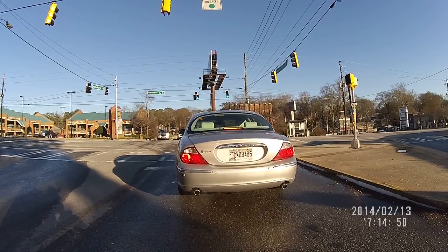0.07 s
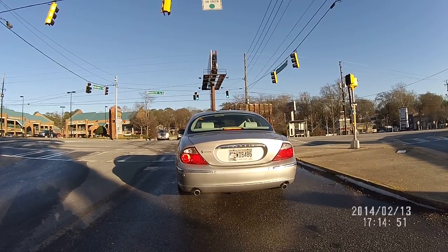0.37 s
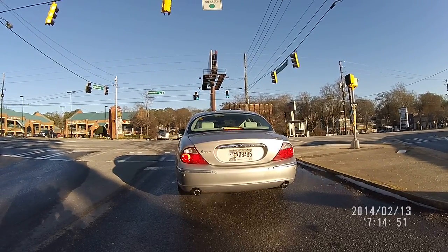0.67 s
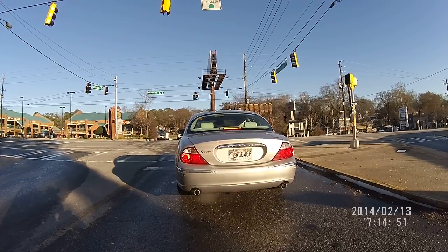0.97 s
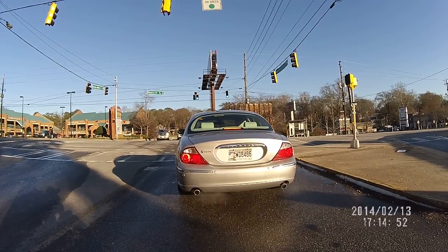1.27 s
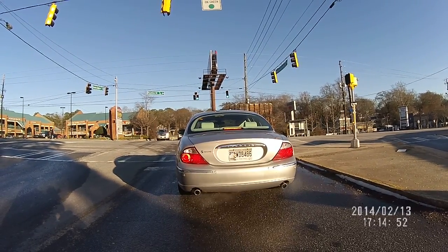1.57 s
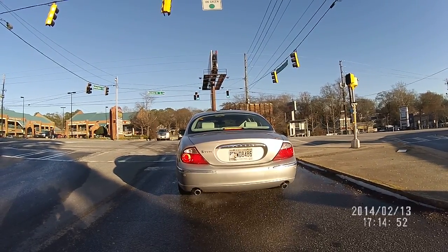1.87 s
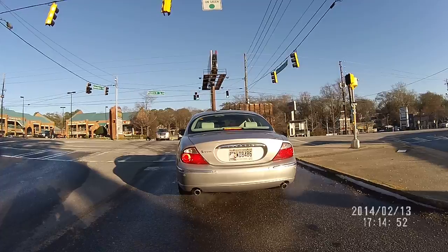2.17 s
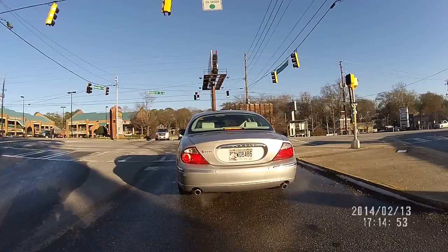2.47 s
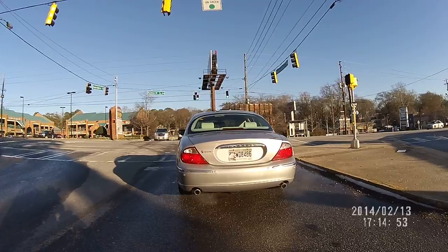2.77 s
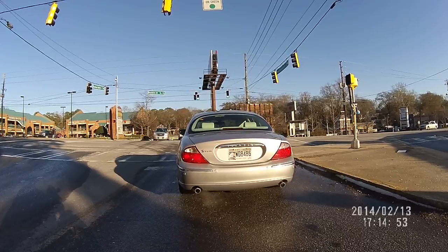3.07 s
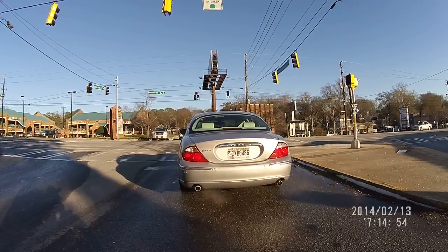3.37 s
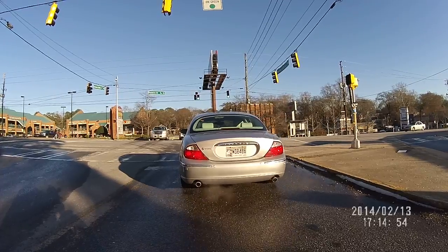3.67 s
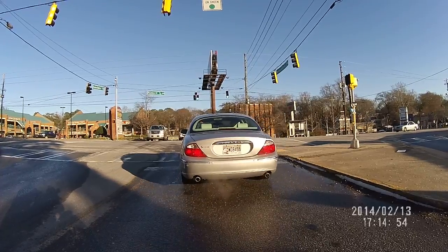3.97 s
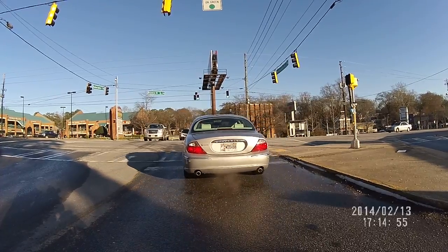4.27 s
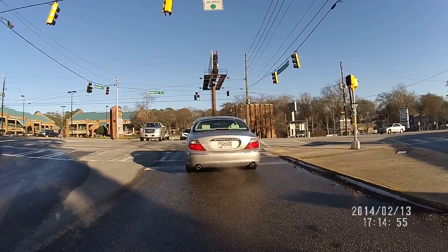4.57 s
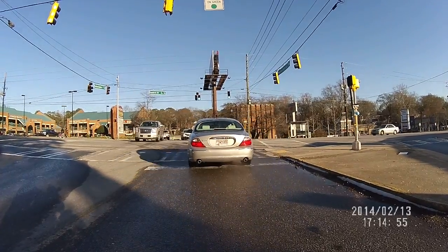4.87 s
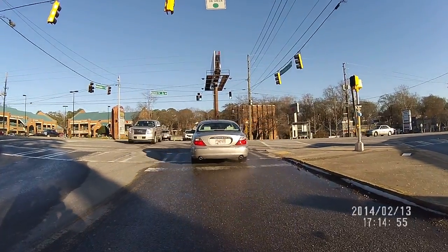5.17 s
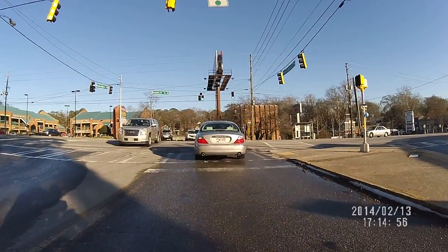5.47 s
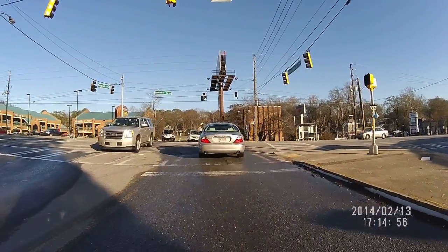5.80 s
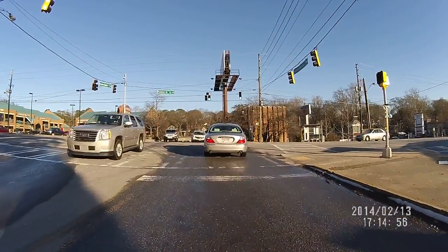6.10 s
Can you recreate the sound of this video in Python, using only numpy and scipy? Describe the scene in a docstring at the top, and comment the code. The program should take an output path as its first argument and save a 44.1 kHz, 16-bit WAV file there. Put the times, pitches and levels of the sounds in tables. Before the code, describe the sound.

A V-twin motorcycle idles at a road junction, heard from a microphone on the bike. Its exhaust thumps over a metallic valve clatter, small hisses and a low rumble. After about a second the idle turns uneven and limping. A sharp click and a dull clunk mark the gear going in. Then the throttle opens and the engine climbs in pitch and loudness, with a harsh rasp and a rising whine.

```python
"""A V-twin motorcycle idles at a traffic light, heard from a microphone on the bike.
Each firing thumps through the pipe and hisses; the valve gear clatters in the ringing engine cases.
After a second the idle starts to limp: the rear cylinder all but misses every third cycle.
Near 3.5 s come a sharp click and a clunk as the bike goes into gear.
From 4.4 s the throttle opens and it pulls away, with rasping valves and a rising whine."""
import sys
import numpy as np
from scipy import signal
from scipy.fft import rfft, irfft, next_fast_len
from scipy.io import wavfile
from scipy.ndimage import uniform_filter1d

SR = 44100
rng = np.random.default_rng(int(sys.argv[2]) if len(sys.argv) > 2 else 0)


def pcm_store(signal):
    """Save signal as 16-bit PCM."""
    levels = np.round(np.clip(np.atleast_2d(signal), -1, 1) * 32767)
    wavfile.write(sys.argv[1], SR, levels.astype(np.int16).T)


N = 270774
TIME = np.arange(N) / SR

# Levels in the tables are relative. A "fade" is the time a ring takes to drop by 60 dB.
# engine speed; each cylinder fires once a cycle: t/s, cycles a second
ENGINE_SPEED = [(0.0, 7.135), (0.916, 7.363), (1.11, 7.021), (1.795, 7.564), (2.017, 7.354), (3.145, 7.471),
                (4.449, 7.305), (4.818, 11.718), (4.963, 13.8), (5.135, 15.4), (5.26, 16.35), (5.44, 17.5),
                (5.8, 17.55), (5.95, 17.3), (6.14, 16.9)]
# load, or how hard the engine works: t/s, load (0-1)
ENGINE_LOAD = [(4.42, 0.07), (4.7, 0.2), (4.85, 0.43), (5.05, 0.54), (5.3, 0.75), (5.48, 0.85),
               (6.14, 0.77)]
# firing strength: load (0-1), front level/dB, rear level/dB
FIRING_LEVELS = [(0, -2, 5), (.13, 1, 1), (.45, 2.2, 0.9), (.68, -1, 0.67)]
# the limp (hard, weak, missed); the crank lags after the miss: rear level/dB, lag/s
LIMP_PATTERN = [(1.3, .0066), (-8.5, 0.0024), (-18.5, 0.000049)]
# ringing notes of the pipe and airbox: f/Hz, fade/s, strength at idle, strength under load
PIPE_NOTES = [(95, 0.078, -0.17, 0.35), (122.9, 0.14, 0.27, -0.081), (163, 0.21, -0.045, -0.0037),
              (207.3, 0.33, 0.11, 0.051), (227.4, 0.12, 0.077, 0.14), (271.2, 0.12, 0.033, -0.22),
              (309.4, 0.12, -0.092, 0.015), (364, 0.23, 0.031, -0.082), (438.6, 0.25, -0.0083, 0.041),
              (568, 0.11, -0.02, -0.029), (590, 0.071, .003, 0.06), (656, 0.054, -0.016, -0.0026)]
# ringing notes of the engine cases: f/Hz, width/Hz, level/dB
CASE_NOTES = [(429, 19, -10), (470, 46, -4), (607, 31.5, 3.5), (660.7, 51.5, 3), (718, 61, 1),
              (806, 43.5, 0), (1055, 170, -5.5), (1200, 103, -5.5), (1540, 83, -5.5), (1790, 87, -4),
              (1892, 57, -3), (2070, 174, -6.5), (2319, 56, -8), (2396, 57, -4), (2627, 20, -10.5),
              (2752, 64, -16.5)]
# broad tone of rattling metal: f/Hz, level/dB
METAL_TONE = [(100, -56), (220, 10), (330, 5.5), (600, -4), (950, -13.5), (1350, -12), (2500, -12.5),
              (3200, -19), (4200, -25), (5200, -20.5), (6200, -30), (7200, -37), (10000, -45), (14000, -60)]
# clatter around one cycle, easing on compression: share of a cycle, level/dB
CLATTER_CYCLE = [(0, 1), (.2, 1.5), (.42, 1), (.57, -1), (.72, 2.54), (.84, 0), (.93, 1.5)]
# tone that load adds to the clatter: f/Hz, level/dB
STRAIN_TONE = [(200, 2), (300, 2.5), (410, 1.5), (480, -3), (580, -2), (760, -5), (1000, -1), (1500, 1),
               (2000, 0), (2550, 4.5), (3200, 2.5), (5000, 4), (9000, 1)]
# tone of rushing gas: f/Hz, level/dB
GAS_TONE = [(300, 4.5), (700, 19.5), (1500, 7.5), (2500, 8), (3500, -2), (4300, -7.5), (5200, -1),
            (6800, -14), (8200, -13), (10000, -28.5), (15000, -35)]
# ringing notes of the rocker cover above the valves: f/Hz, level/dB, fade/s
ROCKER_NOTES = [(1540, -13, .05), (1875, -15, .03), (2380, -5, .025), (2480, -1, 0.026)]
# cam knocks: share of a cycle after the front firing, level/dB
CAM_HITS = [(.135, 1), (.705, -3), (.895, -3.5)]
# ringing notes of the cam cover: f/Hz, level/dB, fade/s
CAM_COVER_NOTES = [(573, -8, 0.051), (659, 0.5, .055), (719, -2.5, 0.041), (830, -7.5, .05)]
# tone of the rumbling frame: f/Hz, level/dB
FRAME_TONE = [(20, -46), (40, -22), (60, 2.5), (110, -0.5), (150, -5), (210, -3), (330, -17), (500, -38),
              (1500, -60)]
# loose parts knocking at idle: t/s, level/dB, f/Hz
LOOSE_HITS = [(0.411, -42, 1046), (0.7894, -43, 1100), (0.8901, -41, 1215), (1.3454, -39, 1806),
              (2.836, -43, 2124)]
# loose metal clicking at the controls: t/s, level/dB
LEVER_HITS = [(3.4165, -48), (3.4245, -37.5), (3.459, -41), (3.4648, -20.5), (3.4670, -43), (3.481, -43),
              (3.5534, -40), (5.3683, -26.5), (5.483, -32.5), (6.114, -28.5)]
# ringing notes of the lever: f/Hz, level/dB, fade/s
LEVER_NOTES = [(4690, -5, 0.011), (4906, 1.5, 0.0083), (5050, -6, 0.012), (5240, -0.5, 0.0064),
               (5830, -6, 0.008), (6350, -15, 0.011)]
# ringing notes of the gearbox: f/Hz, level/dB, fade/s
GEARBOX_NOTES = [(248, 6, 0.05), (346, 2.5, 0.086), (410, -5, .07), (514, -11, 0.046)]

FIRST_FIRING_S, MISFIRE_S, LIMP_FROM_S, GEAR_S, LIMP_TO_S = .006, .48, 1.08, 3.4815, 4.45
REAR_DELAY = 315 / 720  # share of a cycle from front to rear firing in a 45 degree V


def amp(db):
    """Turn decibels into a number to multiply by."""
    return 10 ** (np.asarray(db) / 20)


def unit(x):
    """Scale x to an average size (rms) of 1."""
    return x / np.sqrt(np.mean(x ** 2) + 1e-20)


def curve(rows, at=TIME):
    """Join the rows with straight lines and read off values."""
    return np.interp(at, *np.transpose(rows))


def tone(points, hz):
    """Gain at hz along a curve of (f/Hz, level/dB) points."""
    f, db = np.transpose(points)
    return amp(np.interp(np.log(hz + 1), np.log(f), db))


def filtered(x, response):
    """Multiply each frequency in x by response(frequency)."""
    m = next_fast_len(N + SR // 2)
    return irfft(rfft(x, m) * response(np.fft.rfftfreq(m, 1 / SR)), m)[:N]


def noise(points):
    """Noise shaped by (f/Hz, level/dB) points."""
    return unit(filtered(rng.standard_normal(N), lambda hz: tone(points, hz)))


def spikes(times, sizes):
    """One spike for each event."""
    inside = (times >= 0) & (times < (N - 1) / SR)
    return np.bincount(np.round(times[inside] * SR).astype(int), sizes[inside], N)


def bump(t, width):
    """A smooth hill around t = 0."""
    return np.exp(-.5 * (t / width) ** 2)


def ring(notes, attack_s):
    """The fading notes of a struck part; longer contact softens the start."""
    t = np.arange(SR // 4) / SR
    ringing = sum(amp(db - 60 * t / fade) * np.sin(2 * np.pi * hz * t) for hz, db, fade in notes)
    return (1 - bump(t, attack_s)) * ringing


def strike(times, sizes, notes, attack_s):
    """Ring a part at each of the times."""
    return signal.fftconvolve(spikes(times, sizes), ring(notes, attack_s))[:N]


def swells(times, sizes, lead_s, width_s):
    """A smooth rise and fall that peaks just before each event."""
    t = np.arange(-SR // 20, SR // 20 + 1) / SR
    return signal.fftconvolve(spikes(times, sizes), bump(t + lead_s, width_s), "same")


def firings(weak_rear_db, misfire_db):
    """The crank sets the beat: front firing times, then times and sizes of all firings."""
    cycles = np.cumsum(curve(ENGINE_SPEED) * (TIME > FIRST_FIRING_S)) / SR
    front = np.r_[FIRST_FIRING_S, np.interp(np.arange(1, int(cycles[-1]) + 1), cycles, TIME)]
    front = np.r_[front, 2 * front[-1] - front[-2]]  # closes the last cycle
    limping = (front > LIMP_FROM_S) & (front < LIMP_TO_S)
    limp_db, lag = np.array(LIMP_PATTERN)[np.arange(len(front)) % len(LIMP_PATTERN)].T
    front = front + limping * lag
    rear = front[:-1] + REAR_DELAY * np.diff(front)
    load, front_db, rear_db = np.transpose(FIRING_LEVELS)
    front_db = np.interp(curve(ENGINE_LOAD, front), load, front_db)
    rear_db = np.where(limping[:-1], limp_db[:-1], np.interp(curve(ENGINE_LOAD, rear), load, rear_db))
    rear_db[rear < LIMP_FROM_S] = weak_rear_db
    rear_db[np.argmin(abs(rear - MISFIRE_S))] = misfire_db  # one stray miss before the limp
    times = np.r_[front, rear]
    spread_db = np.interp(curve(ENGINE_LOAD, times), [0, 1], [0.65, .45])  # steadier under load
    return front, times, amp(np.r_[front_db, rear_db] + spread_db * rng.standard_normal(len(times)))


def cycles_turned(front):
    """How many cycles the engine has made at each sample."""
    return np.interp(TIME, front, np.arange(len(front)))


def gas_pulse(t, swell_s, cut_s, echo, trip_s, crack, lead_s):
    """The valve cracks open, flow swells and is cut off; the pipe end echoes it upside down."""
    opening = crack * bump(t + lead_s, 0.00069)
    flow = cut_s / swell_s * bump(t + 1.63 * swell_s, swell_s)
    return opening - flow + bump(t, cut_s) - echo * bump(t - trip_s, cut_s)


def exhaust_thumps(times, sizes, idle_db, load_db):
    """Gas pulses ring the pipe; load makes them fuller."""
    t = np.arange(-SR // 5, SR // 5 + 1) / SR
    after = np.maximum(t, 0)
    hz, fade, at_idle, at_load = np.transpose(PIPE_NOTES)
    notes = np.sin(2 * np.pi * hz[:, None] * after) * amp(-60 * after / fade[:, None])
    notes *= 1 - bump(after, 0.00031)  # the ring builds up while the valve shuts
    soft = gas_pulse(t, swell_s=0.0033, cut_s=0.00076, echo=0.59, trip_s=0.0077, crack=0.5, lead_s=0.0096)
    full = gas_pulse(t, swell_s=0.0024, cut_s=0.002, echo=0.67, trip_s=0.003, crack=0.99, lead_s=0.0079)
    load = curve(ENGINE_LOAD, times)
    idle = signal.fftconvolve(spikes(times, sizes * (1 - load)), soft + at_idle @ notes, "same")
    pull = signal.fftconvolve(spikes(times, sizes * load), full + at_load @ notes, "same")
    low_cut = signal.butter(3, 29, "highpass", fs=SR, output="sos")
    return signal.sosfilt(low_cut, amp(idle_db) * idle + amp(load_db) * pull)


def engine_cases(x, ring_db):
    """Shaken by x, the cases ring with their own notes over a broad metal tone."""
    def response(f):
        notes = sum((-1) ** k * amp(db) * 1j * f * width / (hz * hz - f * f + 1j * f * width)
                    for k, (hz, width, db) in enumerate(CASE_NOTES))
        band = tone([(200, -41), (400, 3.5), (2800, -1.5), (4000, -17), (8000, -51)], f)
        return amp(ring_db) * notes * band + 1j * tone(METAL_TONE, f)
    return filtered(x, response)


def clatter(front, rear, rear_sizes, level_db, load_db, jitter_s, count):
    """Valve gear and chain knock at the same points of each cycle, over a looser rattle."""
    angles = (np.arange(count) + rng.random(count)) / count
    weights = rng.choice([-1, 1], count) * amp(rng.normal(0, 1.55, count))
    cycles = np.arange(len(front) - 1)[:, None] + angles
    times = np.interp(cycles, np.arange(len(front)), front) + rng.normal(0, jitter_s, cycles.shape)
    sizes = weights * amp(rng.normal(0, 2.15, cycles.shape)) * np.sqrt(np.diff(front))[:, None]
    knocks = unit(engine_cases(spikes(times.ravel(), sizes.ravel()), ring_db=7.5))
    rattle = unit(engine_cases(rng.standard_normal(N), ring_db=3))
    load = curve(ENGINE_LOAD)
    rattle_share = np.interp(load, [0, 1], [0.63, 0.14])
    metal = np.sqrt(1 - rattle_share) * knocks + np.sqrt(rattle_share) * rattle
    metal *= amp(np.interp(cycles_turned(front), *np.transpose(CLATTER_CYCLE), period=1))
    strained = filtered(metal, lambda f: tone(STRAIN_TONE, f))
    dip_db = 2 * (1 - np.interp(TIME, rear + 0.04, rear_sizes))  # softer just after a rear miss
    return amp(level_db + load_db * load ** 0.72 - dip_db) * ((1 - load) * metal + load * strained)


def gas_hiss(times, sizes, level_db, load_db):
    """Gas hisses past the valve while the flow swells, a little differently each time."""
    strength = sizes ** 1.4 * amp(rng.normal(0, 0.99, len(sizes)))
    flow = swells(times, strength, lead_s=0.0045, width_s=0.0042)
    spectrum = signal.stft(noise(GAS_TONE), nperseg=512)[2]
    patches = uniform_filter1d(rng.standard_normal(spectrum.shape), 7, axis=0)  # smooth over pitch
    patches = unit(uniform_filter1d(patches, 8, axis=1))  # and over time
    hiss = unit(signal.istft(spectrum * amp(3.3 * patches), nperseg=512)[1][:N])
    return amp(level_db + load_db * curve(ENGINE_LOAD)) * flow * hiss


def background(rumble_db, hiss_db, whine_db):
    """The frame rumbles; the microphone adds faint hiss and a thin whine."""
    rumble = amp(rumble_db) * noise(FRAME_TONE)
    hiss = amp(hiss_db) * noise([(1000, -12), (8000, -1.5), (15000, -3.5)])
    return rumble + hiss + amp(whine_db) * np.sin(2 * np.pi * 9625 * TIME)


def valve_slap(front, level_db, load_db, cycle_share):
    """Once a cycle a valve shuts hard and rings its rocker cover."""
    times = front[:-1] + cycle_share * np.diff(front)
    db = level_db + load_db * curve(ENGINE_LOAD, times) + rng.normal(0, 2, len(times))
    return strike(times, amp(db), ROCKER_NOTES, attack_s=0.0024)


def cam_knocks(front, level_db, load_db, spread_db):
    """The cams, which push the valves open, knock and ring their cover, harder under load."""
    cycle_share, cam_db = np.transpose(CAM_HITS)
    times = (front[:-1, None] + cycle_share * np.diff(front)[:, None]).ravel()
    db = np.tile(cam_db, len(front) - 1) + level_db + load_db * curve(ENGINE_LOAD, times)
    db += rng.normal(0, spread_db, len(times))
    return strike(times, amp(db), CAM_COVER_NOTES, attack_s=0.00089)


def tinkles(level_db, centre_hz, spread, fade_s, count):
    """Small loose parts tick at random times, each at its own pitch."""
    out = np.zeros(N + SR)
    for start, (pitch, size) in zip(rng.integers(0, N, count), rng.standard_normal((count, 2))):
        ting = ring([(centre_hz * np.exp(spread * pitch), level_db + 3 * size, fade_s)], 0.00066)
        out[start:start + len(ting)] += ting
    return out[:N]


def loose_knocks(level_db, fade_s):
    """Now and then a larger loose part knocks and rings briefly."""
    return sum(strike(np.array([t]), amp([db + level_db]), [(hz, 0, fade_s)], attack_s=0.00055)
               for t, db, hz in LOOSE_HITS)


def chatter(rear, sizes, level_db, fade_s, shake_s, count):
    """Once the limp begins, rear firings shake a thin loose part; hard ones shake it most."""
    times = rear[:, None] + 0.0089 + shake_s * rng.random((len(rear), count))
    strength = np.sqrt(sizes)[:, None] * amp(level_db + rng.normal(0, 3, times.shape))
    strength *= times > LIMP_FROM_S
    notes = [(6370, 0, fade_s), (6620, -4, fade_s)]
    return strike(times.ravel(), strength.ravel(), notes, attack_s=0.0008)


def gear_change(click_db, clunk_db):
    """Small metal parts click at the controls; first gear locks in with a dull clunk."""
    times, db = np.transpose(LEVER_HITS)
    clicks = strike(times, amp(db + click_db), LEVER_NOTES, attack_s=0.00038)
    clunk = strike(np.array([GEAR_S]), amp([clunk_db]), GEARBOX_NOTES, attack_s=0.00072)
    return clicks + clunk


def valve_rasp(times, sizes, level_db):
    """As load grows, each valve opens with a harsh burst through the cases."""
    opening = swells(times, sizes * curve(ENGINE_LOAD, times), lead_s=0.0098, width_s=0.0022)
    harsh = noise([(500, -46), (1000, 3.5), (1800, -4.5), (2500, 0.5), (3200, -18.5), (6000, -13)])
    return amp(level_db) * engine_cases(opening * harsh, ring_db=3.5)


def engine_whine(front, level_db, harmonic, waver_db, waver_rad):
    """A slightly wavering engine overtone rises with speed and swells under load."""
    waver = [(4, -3), (15, 3), (45, -23), (200, -120)]
    phase = 2 * np.pi * harmonic * cycles_turned(front) + waver_rad * noise(waver)
    return amp(level_db + waver_db * noise(waver)) * curve(ENGINE_LOAD) ** 1.15 * np.sin(phase)


def scene():
    """All parts of the bike, close to one microphone."""
    front, times, sizes = firings(weak_rear_db=-5.5, misfire_db=-29)
    rear, rear_sizes = times[len(front):], sizes[len(front):]
    exhaust = exhaust_thumps(times, sizes, idle_db=-23, load_db=-15)
    engine = clatter(front, rear, rear_sizes, level_db=-47.5, load_db=14, jitter_s=.00002, count=44)
    engine += gas_hiss(times, sizes, level_db=-44.5, load_db=5.5)
    engine += valve_rasp(times, sizes, level_db=-28.5)
    engine += valve_slap(front, level_db=-56, load_db=25.5, cycle_share=.125)
    engine += cam_knocks(front, level_db=-44, load_db=10, spread_db=1.5)
    engine *= amp(curve([(.95, -0.7), (1.25, 0)]))  # a little softer before the limp
    engine += engine_whine(front, level_db=-40, harmonic=48, waver_db=0.8, waver_rad=.2)
    shift = gear_change(click_db=-2, clunk_db=-33)
    loose_parts = chatter(rear, rear_sizes, level_db=-61, fade_s=.022, shake_s=.14, count=5)
    loose_parts += tinkles(level_db=-51, centre_hz=1750, spread=.25, fade_s=0.066, count=40)
    loose_parts += loose_knocks(level_db=-3, fade_s=0.062)
    steady = background(rumble_db=-43.5, hiss_db=-78.5, whine_db=-90.5)
    return (exhaust + engine + shift + loose_parts + steady)[None]


def record(dry):
    """The microphone keeps nothing above 15250 Hz."""
    return filtered(dry[0], lambda hz: hz < 15250)[None]


dry = scene()
out = record(dry)
pcm_store(out)
```